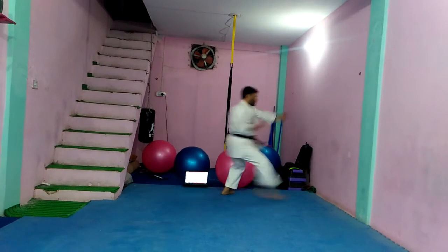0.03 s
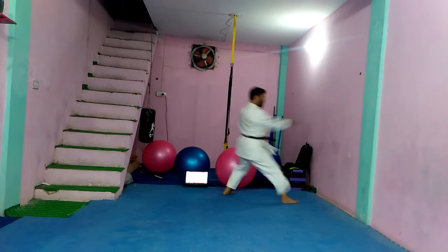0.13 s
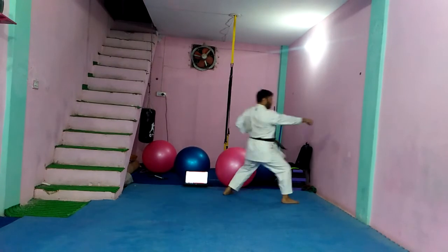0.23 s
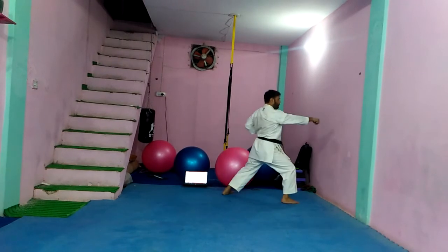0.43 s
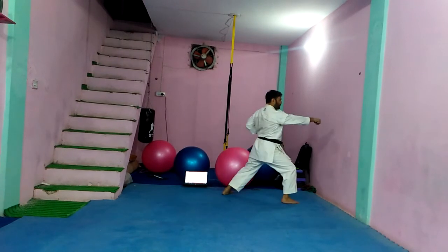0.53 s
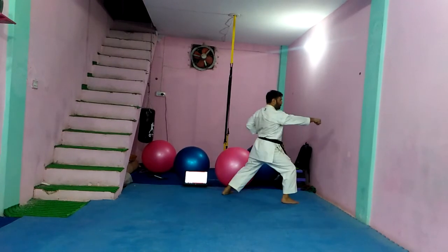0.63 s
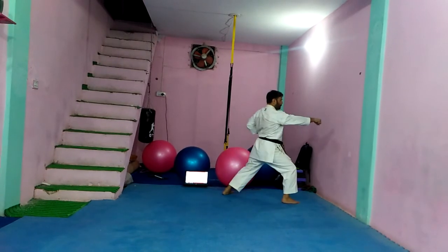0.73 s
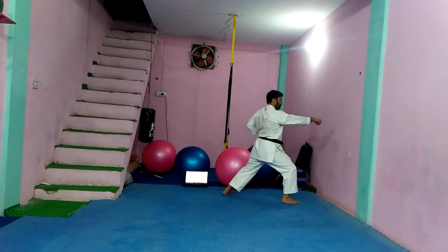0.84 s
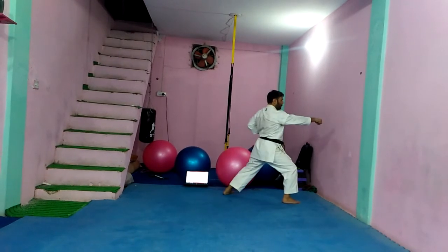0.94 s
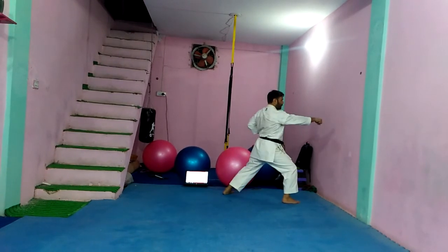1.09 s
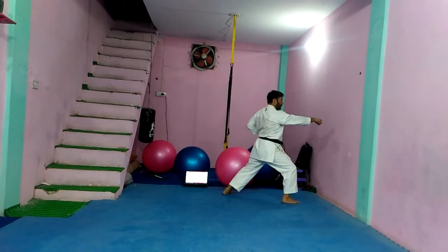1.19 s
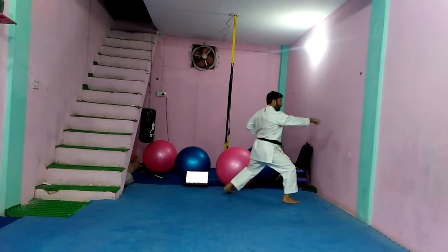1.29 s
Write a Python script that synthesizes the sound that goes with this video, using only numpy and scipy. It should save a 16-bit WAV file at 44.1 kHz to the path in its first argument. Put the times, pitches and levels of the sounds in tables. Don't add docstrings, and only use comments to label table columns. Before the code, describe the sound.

A bare foot stamps once on a foam mat as a heavy cotton sleeve snaps; a soft sliding swish comes first, then low boom and echoes fade in a narrow hard room, microphone a few metres away.

```python
import sys
import numpy as np
from scipy import signal
from scipy.fft import rfft, irfft
from scipy.io import wavfile
from scipy.ndimage import uniform_filter1d

SR = 44100
rng = np.random.default_rng(int(sys.argv[2]) if len(sys.argv) > 2 else 0)


def boost_factor(decibels):
    exponent = np.asarray(decibels, float) / 20
    return 10 ** exponent


def file_out(sig):
    cols = np.atleast_2d(sig).T
    lim = np.clip(cols, -1, 1)
    pcm = np.round(lim * 32767).astype(np.int16)
    wavfile.write(sys.argv[1], SR, pcm)


N = 59535
TIME = np.arange(N) / SR


def evened(x):
    return x / np.sqrt(np.mean(x ** 2) + 1e-20)


def read(points, hz):
    f, value = np.transpose(points)
    return np.interp(np.log(hz + 1), np.log(f + 1), value)


def colour(x, points):
    return evened(irfft(rfft(x) * boost_factor(read(points, np.fft.rfftfreq(N, 1 / SR))), N))


def to_bands(x):
    return signal.stft(x, SR, nperseg=1024, noverlap=768)


def from_bands(z):
    return signal.istft(z, SR, nperseg=1024, noverlap=768)[1][..., :N]


def rustle(per_s, spread_db, points, smooth=1.2):
    hit = rng.random(N) < per_s / SR
    size = np.minimum(rng.exponential(1, N), 4)
    signs, noise = rng.standard_normal((2, N))
    slips = hit * boost_factor(spread_db * size) * np.sign(signs)
    return colour(evened(slips) + smooth * noise, points)


def ringing(start_s, peak_db, hz, t60_s, rise_s):
    since = np.maximum(TIME - start_s, 0)
    return boost_factor(peak_db - 60 * since / t60_s) * np.sin(2 * np.pi * hz * since) * np.minimum(since / rise_s, 1)


# (frequency [Hz], density [dB per Hz])
HISS_COLOUR = [(120, -34.5), (200, 1.5), (431, -13.5), (455, -13.5), (881, -10), (1130, -8.5),
               (14300, -27.5)]


def hiss():
    return boost_factor(-81.5) * colour(rng.standard_normal(N), HISS_COLOUR)


# (frequency [Hz], density [dB per Hz])
SLAB_COLOUR = [(30, -23.5), (60, -4), (110, -3), (160, 2), (205, -4), (235, -20.5), (500, -43.5)]


def rumble():
    level_db, before_db = -46, -13
    start_s, rise_s, t60_s = .25, .05, 1.8
    swell_db = np.interp(TIME, [start_s, start_s + rise_s], [before_db, 0])
    fall_db = 60 * np.maximum(TIME - start_s, 0) / t60_s
    return boost_factor(level_db + swell_db - fall_db) * colour(rng.standard_normal(N), SLAB_COLOUR)


# (frequency [Hz], t60 [s])
WALL_T60 = [(150, 4.5), (400, 1.26), (900, 0.57), (2000, 0.91), (4000, 0.64), (8000, 0.6), (13000, 0.38)]
# (frequency [Hz], level [dB], t60 [s])
WALL_RINGS = [(201, -2, .9), (265, -7, .8), (299, -2, 1.3), (316, -1, 1.4), (327, 0, 1.2), (582, -9, .9),
              (598, -9, 1), (609, -4, 1.15), (622, -5, 1.15), (726, -7, .75), (750, -4, .6)]


def room(x):
    first_echo_s, rings_db = 0.009, -49.5
    sway_per_s = 9
    taps = rng.standard_normal((3, N)) * np.clip(TIME / first_echo_s - 1, 0, 1)
    hz, t, z = signal.stft(taps, SR, nperseg=256)
    decay = boost_factor(-60 * t / read(WALL_T60, hz)[:, None])
    tails = signal.istft(z * decay, SR, nperseg=256)[1][:, :N]
    tails = tails / np.linalg.norm(tails[0])
    phases = np.arange(3)[:, None] / 3
    turns = np.sqrt(2 / 3) * np.cos(2 * np.pi * (sway_per_s * TIME + phases))
    echoes = signal.fftconvolve(x * turns, tails, axes=1).sum(0)
    rings = sum(boost_factor(rings_db + db - 60 * TIME / t60) * np.sin(2 * np.pi * f * TIME)
                for f, db, t60 in WALL_RINGS)
    return (echoes + signal.fftconvolve(x, rings))[:N]


# (time [s], level [dB])
SLIDE_EFFORT = [(0, -39.5), (.04, -44), (.11, -46), (.19, -49), (.23, -47), (.25, -60), (.3, -110),
                (1.3, -110), (1.332, -70), (1.35, -54)]
# (frequency [Hz], density [dB per Hz])
SLIDE_SPECTRUM = [(59, -41), (100, -11), (320, -18), (378, -17.5), (410, -10.5), (765, 1), (1790, -5.5),
                  (3140, -19.5), (14300, -24)]


def slide():
    s, db = np.transpose(SLIDE_EFFORT)
    return boost_factor(np.interp(TIME, s, db)) * rustle(5000, 1.5, SLIDE_SPECTRUM)


# (frequency [Hz], density [dB per Hz])
SNAP_SPECTRUM = [(150, -43), (260, -19), (323, -13), (376, -17.5), (747, -0.5), (1280, 1), (2910, -13.5),
                 (8780, -17.5), (14300, -21)]
# (time [s], peak level [dB], ring [Hz])
CRACKS = [
    (0.265, -23.5, 1200),
    (.277, -22.5, 1046),
    (0.289, -31, 1295),
    (0.298, -30.5, 1414),
    (0.313, -33, 1192),
    (0.3206, -32, 984),
    (0.335, -28, 1450),
    (0.398, -51, 1080),
    (.421, -22.5, 932),
]


def snap():
    start_s, rise_s, hold_s, fall_s = 0.2355, 0.027, 0.032, .05
    corners_s = start_s + np.cumsum([-.01, .01, rise_s, hold_s, fall_s, .05])
    level_db = -24.5 + np.interp(TIME, corners_s, [-80, -19.5, 0, 0, -20, -80])
    out = boost_factor(level_db) * rustle(6000, 1.5, SNAP_SPECTRUM)
    for s, db, hz in CRACKS:
        out = out + ringing(s, db, hz, t60_s=0.037, rise_s=0.00038)
    return out


# (time [s], push level [dB], length [s])
STAMP_PUSHES = [
    (.296, 0, .004),
]
# (frequency [Hz], level [dB], t60 [s], polarity at the microphone [+1 or -1])
LOW_MODES = [(37.9, -20, 3, 1), (59.5, -8.5, 2.1, 1), (73.4, -1.7, 1.85, 1), (83.5, 1.1, 2.2, 1),
             (91.8, .3, 2.7, 1), (97.8, 1, 1.3, 1), (103.5, -2.6, 1.25, -1), (112.2, -13, 2.5, -1),
             (120, 2.6, 2.1, -1), (121.8, -9.3, 3.2, -1), (136.2, -14, 2.2, 1), (149.1, -12, 2.2, -1),
             (155.8, -7, 1.2, 1), (185, -13, 1.8, 1)]
# (time [s], peak level [dB], ring [Hz], t60 [s])
FOOT_KNOCKS = [
    (.122, -50, 120.5, 0.52),
    (.165, -44.5, 71.9, .3),
    (.212, -41.5, 85, .2),
    (0.2565, -29, 99.1, .2),
    (0.257, -39, 308, 0.36),
    (0.261, -36, 199.7, .5),
]


def boom():
    push = np.zeros(N)
    for s, db, length_s in STAMP_PUSHES:
        bump = np.sin(np.pi * np.clip((TIME - s) / length_s, 0, 1)) ** 2
        push = push + boost_factor(db) * bump / (length_s * SR / 2)
    modes = sum(sign * boost_factor(db - 60 * TIME / t60) * np.sin(2 * np.pi * hz * TIME)
                for hz, db, t60, sign in LOW_MODES)
    build_up = 1 - np.exp(-(TIME / .009) ** 2)
    out = boost_factor(-35.5) * signal.fftconvolve(push, modes * build_up)[:N]
    for s, db, hz, t60_s in FOOT_KNOCKS:
        out = out - ringing(s, db, hz, t60_s, rise_s=.004)
    return out


def scene():
    dry = slide() + snap()
    heard = dry + boost_factor(-0.5) * room(dry) + boom() + rumble()
    return np.tile(heard, (2, 1))


# (from [Hz], to [Hz], threshold [dB], ratio [dB per dB])
SUPPRESSOR_BANDS = [
    (340, 1900, -73.5, 2.3),
    (1900, 2800, -78, 2.4),
    (2800, 14500, -90, 3),
]


def suppress(x):
    hz, _, z = to_bands(x)
    change_db = np.zeros(z.shape)
    for lo_hz, hi_hz, threshold_db, ratio in SUPPRESSOR_BANDS:
        band = (hz >= lo_hz) & (hz < hi_hz)
        power = uniform_filter1d((abs(z[band]) ** 2).mean(0), size=7)
        power_db = 10 * np.log10(abs(power) + 1e-20)
        change_db[band] = np.clip((ratio - 1) * (power_db - threshold_db), -16, 0)
    return from_bands(z * boost_factor(uniform_filter1d(change_db, size=9, axis=0)))


# (frequency [Hz], share [0-1])
FILL_SHARE = [(4000, 0.01), (5000, 0.1), (6500, .45), (14000, .4)]


def fill(x):
    hz, t, z = to_bands(x)
    power = uniform_filter1d(abs(z) ** 2, size=16, axis=0)
    level = np.sqrt(uniform_filter1d(power, size=4, axis=1))
    patches = np.kron(rng.random((26, len(t) // 6 + 1)), np.ones((20, 6)))
    filled = patches[:len(hz), :len(t)] < read(FILL_SHARE, hz)[:, None]
    own = to_bands(rng.standard_normal((2, N)))[2]
    own = own / np.sqrt(np.mean(abs(own) ** 2))
    return from_bands(np.where(filled, level * own, z))


def low_pass(x):
    return signal.sosfilt(signal.butter(12, 14430, fs=SR, output="sos"), x)


def record(dry):
    both = fill(suppress(dry[0]) + hiss())
    lowpass = signal.firwin(1023, 14330, window=("kaiser", 9), fs=SR)
    both = signal.oaconvolve(both, lowpass[None], "same")
    return low_pass(both)


dry = scene()
out = record(dry)
file_out(out)
```